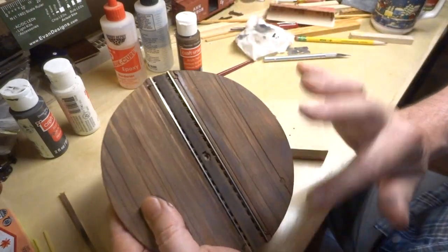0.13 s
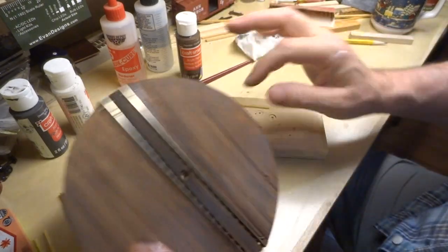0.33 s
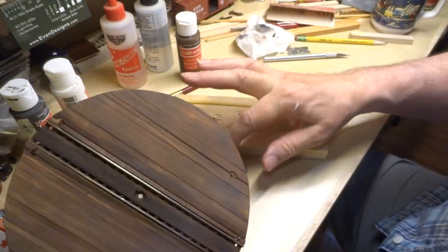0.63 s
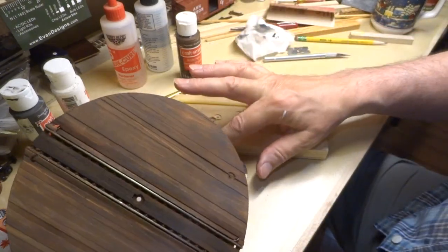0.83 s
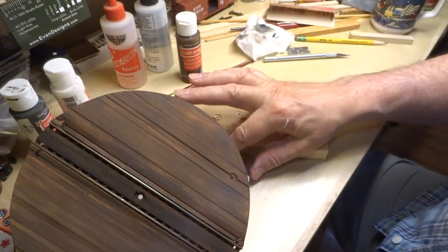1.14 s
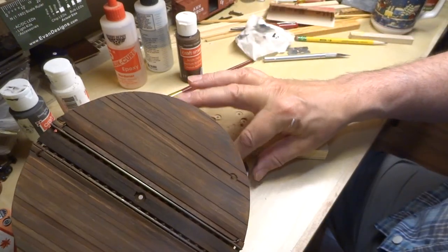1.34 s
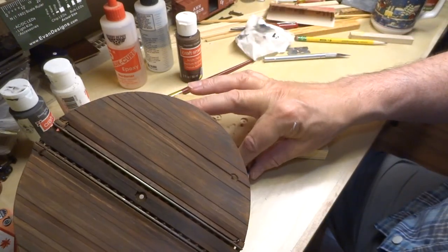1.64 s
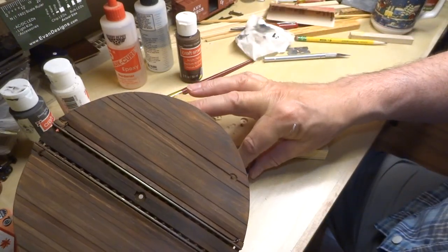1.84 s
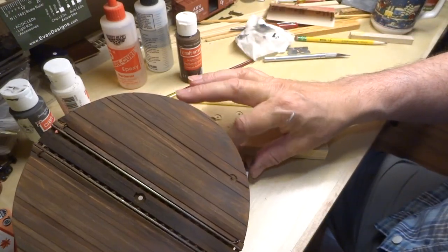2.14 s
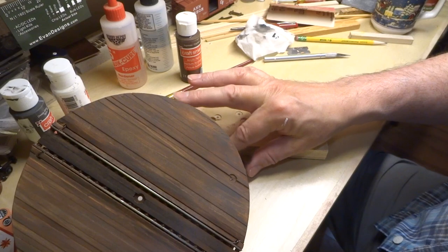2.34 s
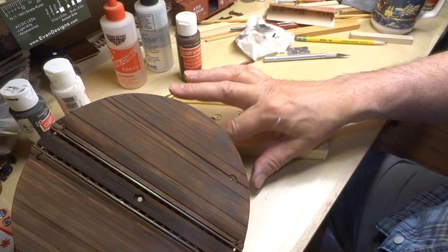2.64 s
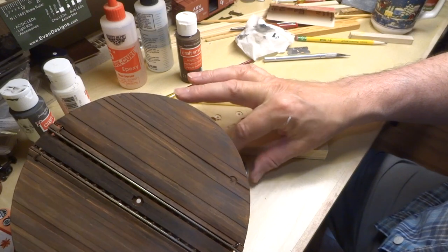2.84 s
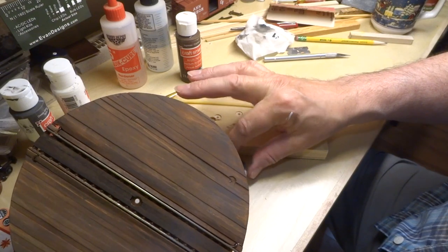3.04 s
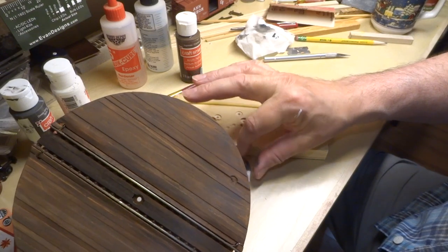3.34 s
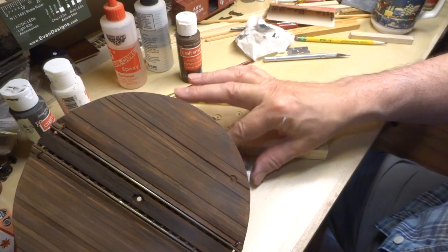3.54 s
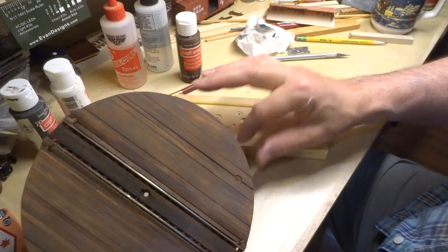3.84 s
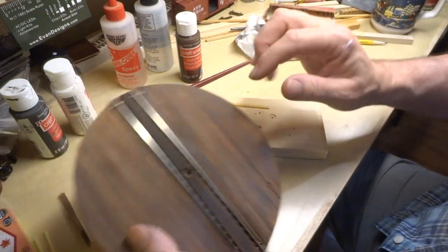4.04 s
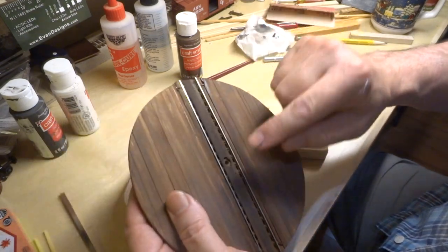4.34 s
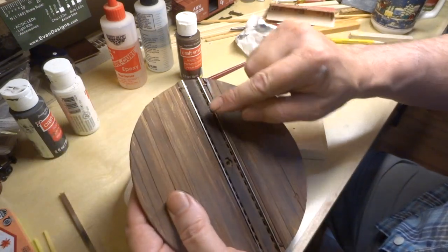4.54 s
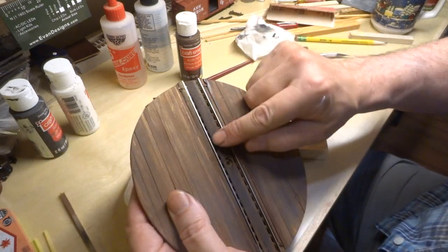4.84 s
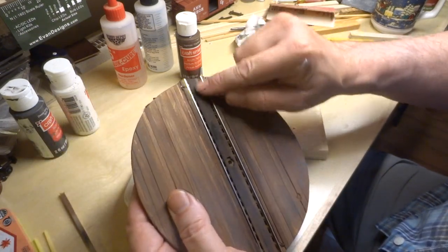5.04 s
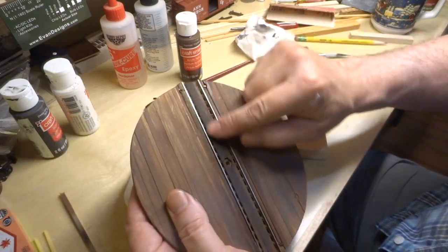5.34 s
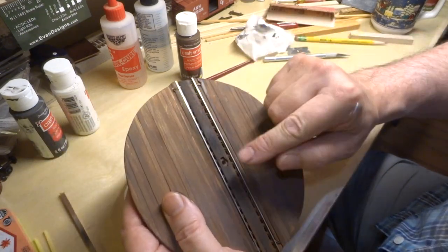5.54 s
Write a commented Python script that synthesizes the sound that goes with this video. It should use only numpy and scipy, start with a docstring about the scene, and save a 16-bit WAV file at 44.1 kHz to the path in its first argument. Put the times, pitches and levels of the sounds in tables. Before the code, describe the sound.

A close stereo view of a workbench in a small, quiet room with steady soft hiss, faint hum and low lumpy handling rumble. At 0 s a short, bright gritty finger stroke; a small nail tick at 0.2 s, a weaker rub, and faint ticks to 0.6 s. Barely heard soft bumps come near 0.75 s. From 1.1 to 1.4 s light wooden knocks and scrapes bounce quickly, then one tap and a scratchy slide at 1.7 s. From 2.0 s knocks resume, thickening at 2.5 s, with hard clacks at 2.75 s. After a lull, a loud rattling cluster runs 3.2-3.45 s, weaker taps follow at 3.63 s, and a dense clatter ends near 4.0 s. Knocks are dry, hollow and mid-pitched, with short decays. Then quieter: a tiny falling brush at 4.3 s, a faint tick at 4.6 s, and airy, gritty strokes at 4.95 and 5.35 s.

```python
"""Wooden block on a workbench

A wooden block is rocked and slid by hand in a small quiet room: knocks, bounces and scrapes ring its modes.
A finger strokes the ribbed top of a wooden disc (gritty noise), fingernails tick, a brush falls in pitch,
and arms bump the bench softly (low modes). Rumble and rustle of handling, narrow-noise hum and steady hiss
lie below; decaying noise gives the room."""
import sys
import numpy as np
from scipy import signal
from scipy.fft import rfft, irfft, next_fast_len
from scipy.io import wavfile

SR = 44100
rng = np.random.default_rng(int(sys.argv[2]) if len(sys.argv) > 2 else 0)


def dump(signal):
    """Clip the signal to [-1, 1] and save it as 16-bit WAV at the path in sys.argv[1]."""
    limited = np.clip(np.atleast_2d(signal).T, -1, 1)
    pcm = np.round(limited * 32767).astype(np.int16)
    wavfile.write(sys.argv[1], SR, pcm)


N = 251370

# block sliding on bench: (start [s], length [s], loudest moment [0-1 of length],
# bright hiss [dB], dull hiss [dB], wood grains [dB])
SLIDES = [(1.092, 0.068, 0.9, -56, -63, -43.5), (1.168, 0.05, 0.37, -65, -70, -55),
          (1.205, 0.065, 0.13, -55, -58, -49), (1.666, 0.031, 0.03, -50, -47.5, -58),
          (1.697, 0.025, 0.07, -70, -70, -48.5), (1.761, 0.055, 0.01, -61, -60, -52.5),
          (1.892, 0.043, 0.36, -59.5, -57.5, -59), (1.953, 0.093, 0.6, -58.5, -61, -71),
          (2.281, 0.068, 0.36, -55.5, -60, -44.5), (3.187, 0.013, .3, -76.5, -79, -56),
          (3.233, 0.1, 0.3, -59.5, -74.5, -46.5), (3.294, 0.083, 0.1, -64.5, -66, -37.5),
          (3.628, .03, 0, -57.5, -61, -53), (3.725, 0.063, 0, -64.5, -71.5, -65.5),
          (3.88, 0.031, 0.8, -69.5, -69.5, -59)]


def from_db(db):
    """Decibels to gain."""
    return 10 ** (np.asarray(db) / 20)


def rms_one(x):
    """Scale to rms 1."""
    return x / np.sqrt(np.mean(x ** 2) + 1e-20)


def drift(rate_hz):
    """Random steps of spread 1 joined by straight lines; holds the last value after 2000 steps."""
    steps = rng.standard_normal(2000)
    return np.interp(np.arange(N) / SR * rate_hz, np.arange(2000), steps)


def coloured(spectrum):
    """Noise with a spectrum given as (frequency [Hz], density [dB per Hz]); rms 1."""
    size = next_fast_len(N)
    hz = np.maximum(np.arange(size // 2 + 1) * SR / size, 1)
    point_hz, point_db = np.transpose(spectrum)
    gain = from_db(np.interp(np.log(hz), np.log(point_hz), point_db))
    return rms_one(irfft(rfft(rng.standard_normal(size)) * gain, size)[:N])


def band(x, low_hz, high_hz):
    """Band-pass with steep edges."""
    return signal.sosfilt(signal.butter(3, [low_hz, high_hz], "band", fs=SR, output="sos"), x)


def ring(force, hz, t60_s):
    """Two-pole resonance: a unit click sets a decaying sine of height 1 ringing."""
    radius = from_db(-60 / (t60_s * SR))
    w = 2 * np.pi * hz / SR
    return signal.lfilter([0, np.sin(w)], [1, -2 * radius * np.cos(w), radius ** 2], force + 1e-18)


def narrow_noise(hz, width_hz):
    """Noise ringing in one resonance; rms 1."""
    return rms_one(ring(rng.standard_normal(N), hz, np.log(1000) / (np.pi * width_hz)))


def swells(rows, column, loss_db):
    """Gain of rubbing contacts: each swells to its loudest moment, sinks after it and fades at its ends.

    loss_db: loss over one length (before, after) the loudest moment."""
    edge_s = 0.012
    t, gain = np.arange(N) / SR, np.zeros(N)
    for row in rows:
        start_s, length_s, loudest = row[:3]
        fade = np.clip(np.minimum(t - start_s, start_s + length_s - t) / edge_s + 0.66, 0, 1)
        on = fade > 0
        late = (t[on] - start_s) / length_s - loudest
        slope_db = np.where(late < 0, loss_db[0], -loss_db[1])
        gain[on] += fade[on] * from_db(row[column] + slope_db * late)
    return gain


def friction(gain, spectrum, rings, rough_db):
    """Gritty hiss of a sliding contact; the rubbed surface rings come and go."""
    grit = from_db(rough_db * drift(150) + 2.0 * drift(980))
    ringing = sum(from_db(level_db + 4.1 * drift(23)) * narrow_noise(hz, width_hz)
                  for hz, width_hz, level_db in rings)
    return gain * rms_one((coloured(spectrum) + ringing) * grit)


def burst(start_s, level_db, hz, edge_ratio, rise_s):
    """A short puff of noise around one pitch: linear rise, exponential fall."""
    out = np.zeros(N)
    t = np.arange(round(6 * rise_s * SR)) / SR / rise_s
    sos = signal.butter(2, [hz / edge_ratio, hz * edge_ratio], "band", fs=SR, output="sos")
    settled = signal.sosfilt(sos, rng.standard_normal(len(t) + 2000))[2000:]
    first = round(start_s * SR)
    out[first:first + len(t)] = from_db(level_db) * rms_one(settled) * t * np.exp(1 - t)
    return out


def background():
    """Steady hiss, partly unlike in the two channels, and faint wavering hum lines of narrow noise."""
    # both channels alike: (frequency [Hz], density [dB per Hz])
    mid_spectrum = [(12, -26.5), (20, 1), (63, -3.5), (88, -5), (123, -13.5), (154, -14), (198, -5.5),
                    (328, -9.5), (513, -19.5), (1330, -17.5), (1910, -22), (4000, -27.5), (9000, -30.5),
                    (15800, -29.5)]
    # what differs left to right: (frequency [Hz], density [dB per Hz])
    side_spectrum = [(18, -72.5), (30, -38), (81, -8.5), (295, -3.5), (760, -7), (844, -8.5), (1160, -9.5),
                     (3310, -20.5), (11400, -35.5), (16000, -38)]
    # hum lines: (frequency [Hz], width [Hz], rms level [dB])
    hum_lines = [(56, 1.5, -69), (130, 11.3, -72), (1315, 28, -89), (1784, 32, -80.5), (11660, 90, -78.5)]
    mid_db, side_db = -62, -64
    mid = from_db(mid_db) * coloured(mid_spectrum)
    side = from_db(side_db) * coloured(side_spectrum)
    hum = sum(from_db(level_db) * narrow_noise(hz, width_hz) for hz, width_hz, level_db in hum_lines)
    return mid + hum + side * [[1], [-1]]


def handling():
    """Lumpy rumble and rustle carried through the bench: two noises that follow the vigour of handling."""
    # vigour, as rustle: (time [s], level [dB])
    vigour = [(0, -67), (.6, -68), (.87, -60), (1.29, -62.5), (2.0, -66), (2.3, -60), (3.02, -60.5),
              (3.171, -62), (3.45, -56.5), (3.8, -61.5), (4.15, -63.5), (4.44, -68.5), (5.7, -70.5)]
    rumble_db = -63  # at mean vigour, before the lumps
    rumble_follows = 0.67  # share of the rustle's swing
    vigour_db = np.interp(np.arange(N) / SR, *np.transpose(vigour))
    rumble = coloured([(30, -21.0), (60, -2), (130, 1.2), (250, -8.5), (400, -42.5)])
    rumble *= from_db(4.0 * drift(12))
    rustle = coloured([(150, -17), (280, -0.18), (700, -7.5), (1500, -15), (2600, -33)])
    rustle *= from_db(2.6 * drift(8.5))
    rumble_gain = from_db(rumble_db + rumble_follows * (vigour_db - vigour_db.mean()))
    return rumble_gain * rumble + from_db(vigour_db) * rustle


def room(x):
    """A tail of dense echoes that dies faster in the treble, mostly shared by both channels."""
    # decay by band: (from [Hz], to [Hz], t60 [s], relative level [dB])
    decays = [(180, 740, 0.28, -22.5), (696, 1860, 0.23, -22), (1510, 5740, 0.21, -26),
              (3194, 14000, 0.189, -22)]
    t = np.arange(SR // 2) / SR
    build = 1 - np.exp(-t / 0.00414)  # echoes thicken after the direct sound
    tail = sum(from_db(level_db - 60 * t / t60_s) * build * band(rng.standard_normal((2, len(t))), low_hz, high_hz)
               for low_hz, high_hz, t60_s, level_db in decays)
    mid, side = signal.fftconvolve(x[None], from_db(-15.0) * tail, axes=1)[:, :N]
    return mid + from_db(-9.5) * side * [[1], [-1]]


def bump(start_s, level_db, hz):
    """A soft push swells over a few ms and sets the bench top's low modes ringing."""
    # bench top: (multiple of the lowest mode, level [dB], t60 [s])
    bench_modes = [(1, 1, .12), (1.45, -7, 0.089), (2.1, -1, 0.14), (3.1, 2, 0.091)]
    rise_s = 0.004
    t = np.arange(2000) / SR
    envelope = t / rise_s * np.exp(1 - t / rise_s)
    push = np.zeros(N)
    first = round(start_s * SR)
    push[first:first + len(t)] = from_db(level_db - 43.5) * np.sin(2 * np.pi * 1.28 * hz * t) * envelope
    ringing = sum(from_db(mode_db) * ring(push, multiple * hz, t60_s)
                  for multiple, mode_db, t60_s in bench_modes)
    return band(ringing, 70, 900)


def arm_bumps():
    """Arms bump the bench: each push rings its low modes."""
    # (time [s], relative level [dB], lowest mode [Hz])
    bumps = [(0.737, -35, 132), (0.775, -39, 118.5), (3.52, -35, 125.5), (3.56, -42, 127.5),
             (4.288, -49, 112), (4.329, -41, 130), (4.87, -42.5, 145.5), (4.919, -43, 147)]
    return sum(bump(*row) for row in bumps)


def brush():
    """A brush in three noise puffs, each lower in pitch and longer."""
    start_s, step_s, rise_s = 4.319, 0.01, 0.003
    first_hz, fall_ratio, level_db = 4200, 0.79, -57.5
    return sum(burst(start_s + k * step_s, level_db, first_hz * fall_ratio ** k, 1.12, rise_s * (1 + k))
               for k in range(3))


def nail_ticks():
    """Fingernail ticks: short puffs of band noise."""
    # (time [s], relative level [dB], centre [Hz], band edge ratio)
    ticks = [(.2205, -36.5, 4530, 1.8), (.449, -42, 9000, 1.7), (.583, -45, 12800, 1.26),
             (.601, -44, 10730, 1.6), (4.327, -40, 12500, 1.26), (4.6245, -49, 11500, 1.44)]
    return sum(burst(start_s, level_db - 14.5, hz, edge_ratio, rise_s=0.0031)
               for start_s, level_db, hz, edge_ratio in ticks)


def strokes():
    """Finger and sleeve strokes: dull and bright friction noise with surface rings."""
    # (start [s], length [s], loudest moment [0-1 of length], bright hiss [dB], dull hiss [dB])
    rows = [(0, 0.093, 0.5, -47.5, -53.5), (0.254, 0.14, 0, -68.5, -59.5), (4.12, 0.063, 0.4, -69.5, -69),
            (4.22, 0.07, 0.76, -67.5, -80), (4.325, .095, 0, -74, -58.5), (4.458, 0.075, 0.2, -73.5, -66),
            (4.945, 0.16, 0.41, -54.5, -62.5), (5.323, .165, 0.33, -51.5, -60.5),
            (5.49, 0.062, 0.56, -72, -72.5)]
    # rubbed surface: (frequency [Hz], width [Hz], level [dB])
    rings = [(1339.9, 180, -8.5), (3240, 67, -11.5), (4380, 150, -12), (5550, 160, -10), (7330, 330, -36),
             (7960, 360, -32), (9100, 110, -10), (10700, 740, -8), (12750, 400, -9.5)]
    # skin noise: (frequency [Hz], density [dB per Hz])
    dull_spectrum = [(800, -21), (1300, -23), (2300, 0.5), (3300, -3.5), (5000, -2.5), (6500, -5.5)]
    bright_spectrum = [(4000, -28), (5300, -9.5), (7000, 2.5), (9000, -3), (11500, 2.5), (14500, -5.5),
                       (16000, -28)]
    loss_db = (20.5, 7)
    dull = friction(swells(rows, 4, loss_db), dull_spectrum, rings[:3], rough_db=2.5)
    bright = friction(swells(rows, 3, loss_db), bright_spectrum, rings[3:], rough_db=2.0)
    return dull + bright


def slide_hiss():
    """Hiss of the sliding block: dull and bright friction noise with surface rings."""
    # rubbed surface: (frequency [Hz], width [Hz], level [dB])
    rings = [(4250, 230, 0), (6000, 300, -3), (7870, 340, -2.5), (9900, 350, -8), (12218, 500, -8)]
    # sliding noise: (frequency [Hz], density [dB per Hz])
    dull_spectrum = [(2500, -23.5), (3500, -28), (4300, -9), (7800, 2), (9000, 0), (12000, -13)]
    bright_spectrum = [(6000, -25.5), (9500, -11.5), (11800, -2), (14000, -10.5), (16000, -12.5)]
    loss_db = (10, 10.5)
    dull = friction(swells(SLIDES, 4, loss_db), dull_spectrum, rings[:3], rough_db=1.5)
    bright = friction(swells(SLIDES, 3, loss_db), bright_spectrum, rings[3:], rough_db=3.5)
    return dull + bright


def crack(at, strength, spectrum, decays):
    """Above the clear modes the many small ones blur into noise with a short and a longer decay."""
    blows = np.zeros(N)
    np.add.at(blows, at, strength)
    dying = sum(from_db(level_db) * signal.lfilter([1], [1, -from_db(-60 / (t60_s * SR))], blows)
                for t60_s, level_db in decays)
    return dying * coloured(spectrum)


def block():
    """Each knock is a first contact and a few ms of chatter; sliding feeds dense grains to the same modes."""
    # block on bench: (time [s], relative level [dB], middle modes [dB], hardness: crack against level [dB])
    knocks = [(1.1186, -17.5, 2, -16.5), (1.1617, -23, 2.5, -20.5), (1.1903, -39.5, 12.5, -9),
              (1.2241, -27, -29, -17), (1.311, -16, 1, -27.5), (1.3441, -17.5, -6, -29),
              (1.3713, -39, 9.5, -28.5), (1.3912, -18.5, -12, -32), (1.4199, -29.5, -4.5, -31.5),
              (1.6632, -22, -11.5, -30), (1.7064, -39, 4.5, -23), (1.963, -43, -23, -15),
              (2.0261, -31, 5.5, -23.5), (2.079, -18, -8, -29.5), (2.107, -31, 8, -25),
              (2.1276, -28.5, -3.5, -24), (2.1464, -40, 10, -24), (2.157, -34, -12, -27.5),
              (2.175, -41.5, -10, -23), (2.3047, -27, -6.5, -31.5), (2.3125, -25.5, 4, -21),
              (2.3336, -19.5, -10.5, -35.5), (2.3881, -26, 9.5, -9.5), (2.3996, -19, -24, -33),
              (2.5006, -12, 2.5, -21.5), (2.5194, -13.5, -9, -45), (2.5312, -17.5, -8.5, -34),
              (2.5738, -18, -1, -24.5), (2.598, -24, -8.5, -37), (2.6231, -24, -1, -26),
              (2.6395, -24, -8.5, -34), (2.7489, -6.5, -15, -15.5), (2.7525, -12, -4, -38.5),
              (2.7867, -9, -6.5, -24), (2.8456, -28.5, 5.5, -13.5), (2.9643, -20, -0.5, -24),
              (2.9949, -37, 8.5, -33), (3.2015, -12, -4, -18), (3.2355, -25.5, -23, -23),
              (3.2827, -5.5, -12, -20), (3.3076, -12, -2, -17), (3.3216, -25, 10.5, -20),
              (3.3374, -10, -18, -27), (3.3413, -13, -9, -36), (3.3797, -16.5, 0, -24),
              (3.4017, -16, -8, -29), (3.4353, -21.5, -5.5, -28.5), (3.6289, -37, 0, -18),
              (3.6381, -29, -9.5, -16.5), (3.6504, -31, -17, -31), (3.7579, -24, 4, -15.5),
              (3.8174, -22, -16, -28.5), (3.8205, -18, -2.5, -28), (3.8547, -9.5, -0.5, -18.5),
              (3.8714, -15, -12.5, -46.5), (3.8846, -12, -11, -31.5), (3.9259, -20, -0.5, -24.5),
              (3.9523, -14, -14, -31), (3.9767, -26.5, 5.5, -20.5), (3.9904, -16.5, -10.5, -32.5),
              (4.0094, -37.5, -15, -24)]
    # block modes: (frequency [Hz], level [dB], t60 [s])
    low_modes = [(305.23, -15, .06), (402, -0.5, 0.057), (546.3, -4.5, 0.11), (661.8, 0, 0.063),
                 (725, 1, 0.059), (776.7, -2.5, 0.1)]
    middle_modes = [(1070, -20, 0.033), (1053.4, 2, 0.032), (1394, -10, 0.052), (1327, 0.5, 0.02),
                    (1642, -6, 0.037)]
    high_modes = [(1880, -14, 0.032), (2056, 0.5, 0.029), (2154, -4.5, 0.0227), (2124, 0, 0.0211),
                  (2324, -3, 0.033), (2680, -19, 0.032), (2906, -13, 0.02), (3098, -23, 0.04)]
    # noise of hard contact: (frequency [Hz], density [dB per Hz])
    crack_spectrum = [(2500, -7.5), (3400, -5.5), (4200, -0.7), (5600, -4), (7500, -8), (9000, -9),
                      (11000, -27.5)]
    snap_spectrum = [(7000, -26.5), (9000, -17), (10500, 5.5), (12200, 8), (14000, -0.5), (16000, -21)]
    chatter_s = 0.003  # scale of the contact spacing

    knock_s, level_db, middle_db, hard_db = np.transpose(knocks)
    louder_db = level_db - level_db.mean()
    harder_db = hard_db - hard_db.mean()
    # low modes: stronger in soft, flat, gentle landings
    low_db = -9 - 0.46 * louder_db + 0.4 * middle_db - 0.3 * harder_db
    # snap: follows hardness; a landing after a pause snaps more than a quick bounce
    fresh_db = 6 * np.tanh(np.diff(knock_s, prepend=0) / 0.065)
    snap_db = -41.5 - 0.05 * louder_db + 0.44 * harder_db + fresh_db

    count = np.arange(8)
    gaps = rng.uniform(.1, .6, (len(knock_s), 8)) * (count > 0)
    at = ((knock_s[:, None] + chatter_s * np.cumsum(gaps, axis=1)) * SR).astype(int)
    contacts = from_db(-2.0 * count - 4.1 * (count > 0))  # the first contact is the hardest
    grains = rng.standard_normal(N) * swells(SLIDES, 5, loss_db=(25.5, 21.5))
    grains *= from_db(1.6 * drift(170))

    # (modes, level in knocks [dB], level in slides [dB])
    groups = [(low_modes, low_db, -26), (middle_modes, middle_db + 0.5, -24),
              (high_modes[:5], 0, -23.1),
              (high_modes[5:], 0.5 * harder_db, -23.1)]  # the three highest follow hardness
    out = np.zeros(N)
    for modes, group_db, slide_db in groups:
        for hz, mode_db, t60_s in modes:
            force = grains * from_db(slide_db)
            # the contact point shifts
            spot = from_db(rng.normal(0, 2.5, at.shape)) * rng.choice([-1, 1], at.shape)
            # and each knock lands on another spot
            spot *= from_db(rng.normal(0, 2.0, (len(knock_s), 1)))
            np.add.at(force, at, from_db(level_db + group_db - 9)[:, None] * contacts * spot)
            out += from_db(mode_db) * ring(force, hz, t60_s)
    out = band(out, 232, 3840)

    crack_strength = from_db(level_db + hard_db - 7.5)[:, None] * contacts ** 2.08
    snap_strength = from_db(level_db + snap_db)[:, None] * contacts ** 1.8
    # decays: (t60 [s], level [dB])
    out += crack(at, crack_strength, crack_spectrum, [(.018, 1.7), (.09, -20.5)])
    out += crack(at, snap_strength, snap_spectrum, [(.012, 0), (.06, -18)])
    return out


def scene():
    """Everything on the bench, slightly stronger at left, plus the room, handling and background."""
    near = arm_bumps() + brush() + nail_ticks() + strokes() + slide_hiss() + block()
    direct = near * from_db([[.15], [-.15]])
    return direct + room(near) + handling() + background()


def record(dry):
    """A steep low-pass cuts the top."""
    cutoff_hz = 15800
    return signal.sosfilt(signal.ellip(10, .5, 65, cutoff_hz, fs=SR, output="sos"), dry)


dry = scene()
out = record(dry)
dump(out)
```